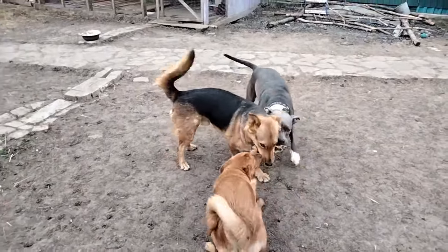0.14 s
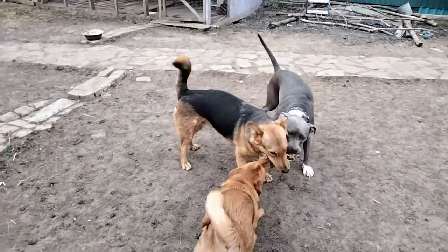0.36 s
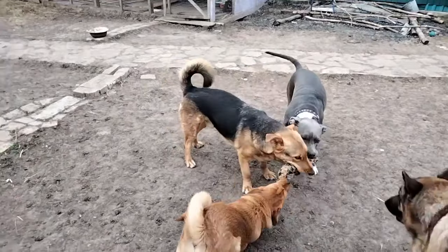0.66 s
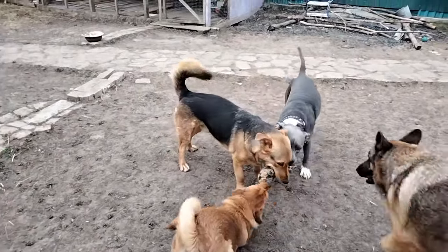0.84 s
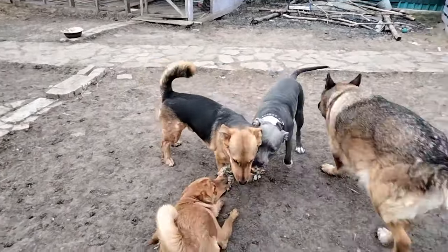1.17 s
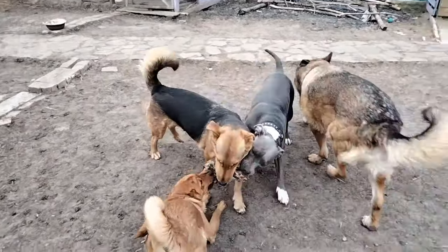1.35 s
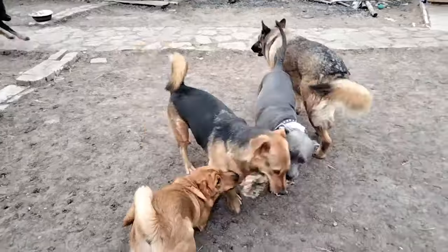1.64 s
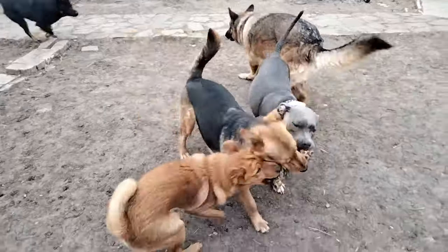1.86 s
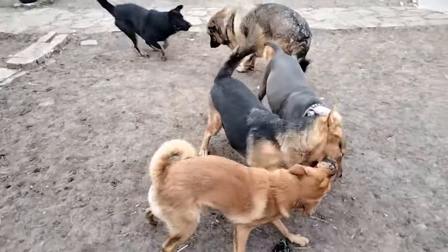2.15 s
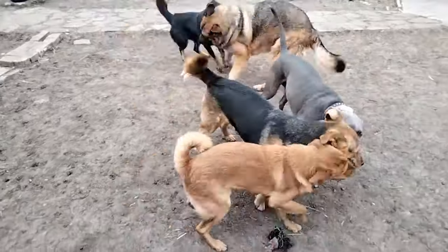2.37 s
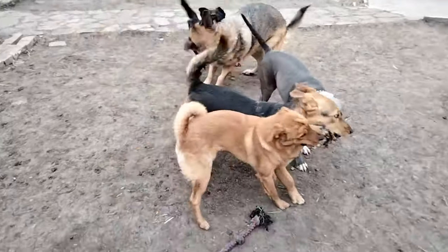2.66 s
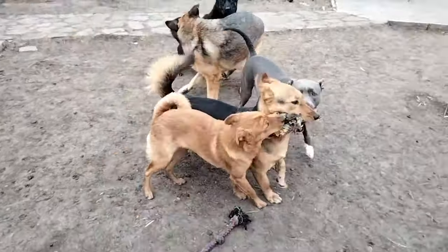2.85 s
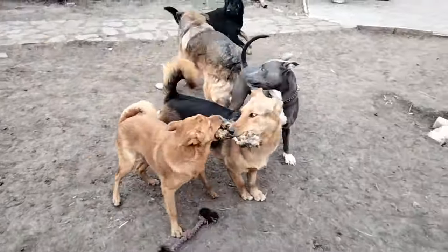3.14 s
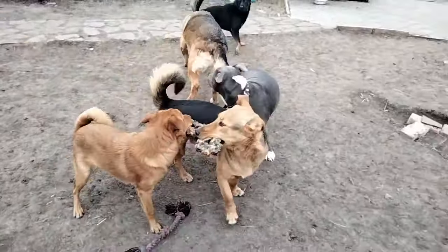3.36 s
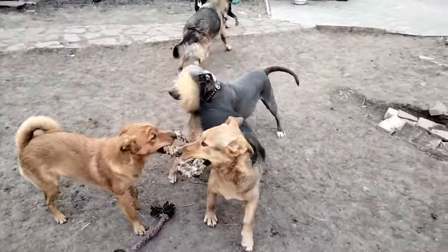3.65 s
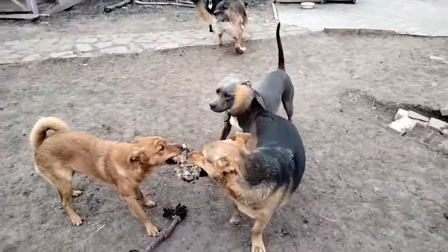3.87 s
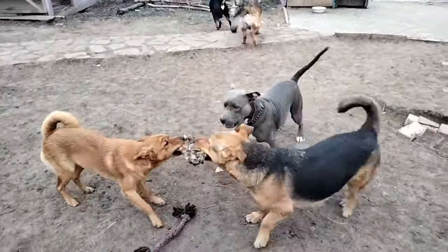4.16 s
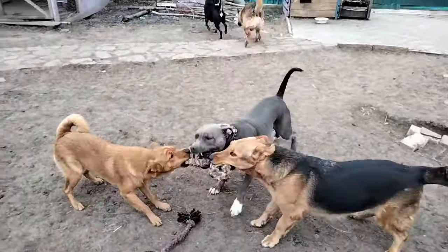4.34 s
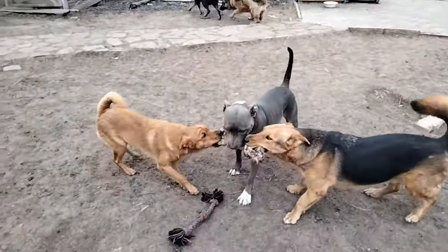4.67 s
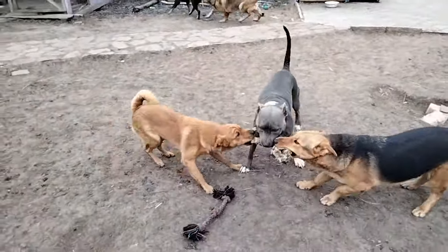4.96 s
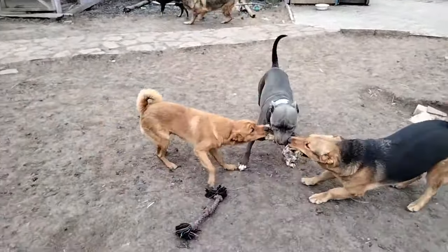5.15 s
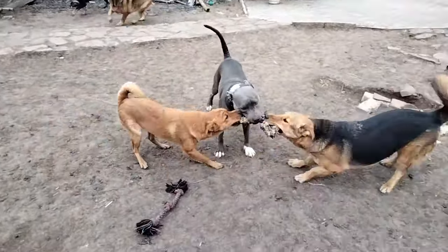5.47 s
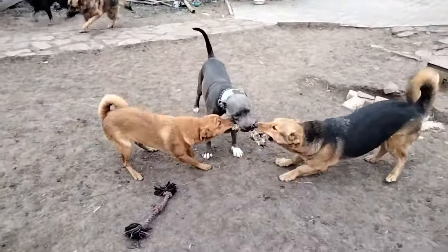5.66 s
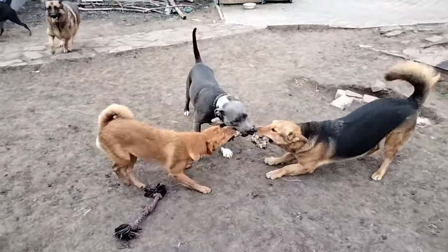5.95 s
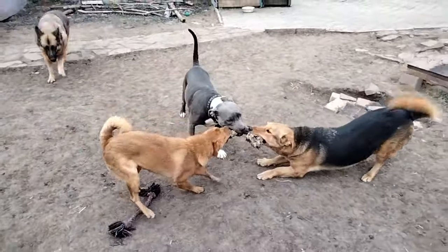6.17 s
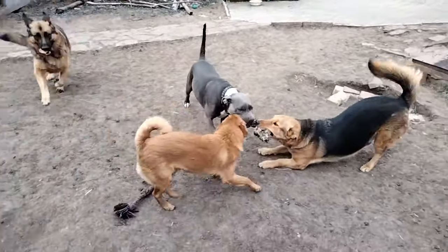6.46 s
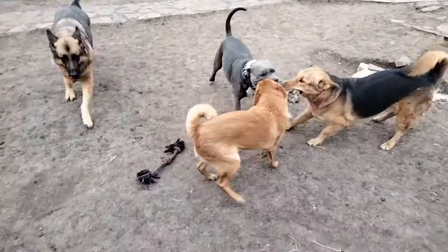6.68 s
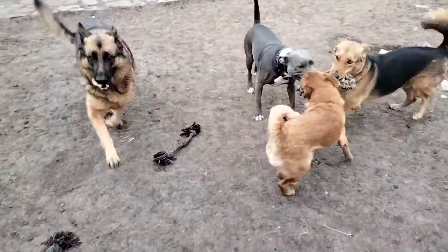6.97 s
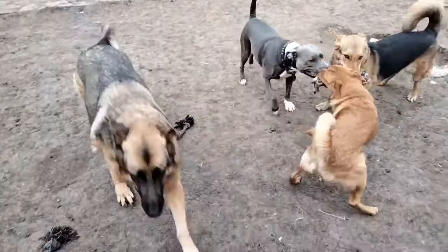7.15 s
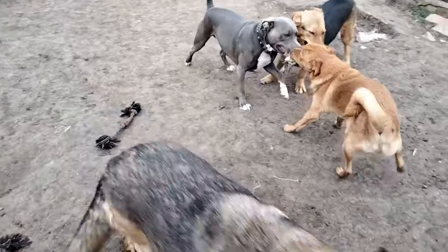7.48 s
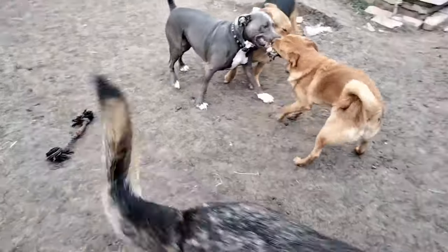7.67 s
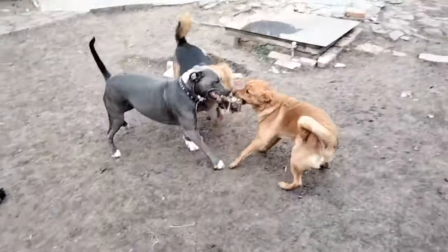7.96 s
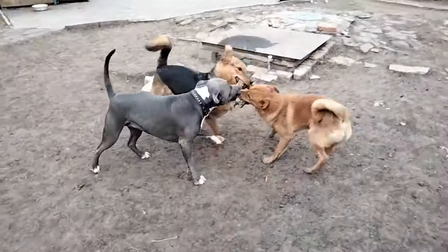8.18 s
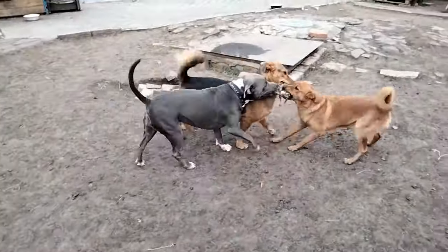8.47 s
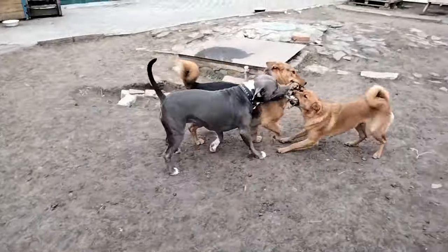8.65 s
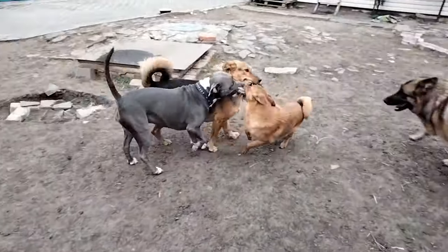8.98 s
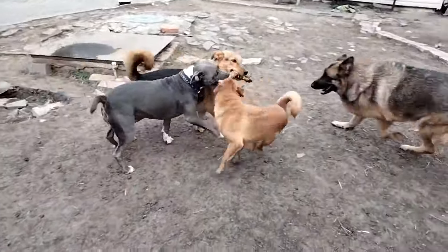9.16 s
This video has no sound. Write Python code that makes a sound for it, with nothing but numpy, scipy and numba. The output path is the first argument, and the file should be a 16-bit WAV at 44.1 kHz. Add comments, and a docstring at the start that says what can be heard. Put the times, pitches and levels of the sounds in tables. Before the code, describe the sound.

Outdoors in a dirt yard, several dogs tug at a toy, growling low and raspy through clenched teeth close to the microphone. Paws scuff and small clicks snap. Early on, a dog slightly further away gives a high yelp that breaks into a short moan, with a faint wall echo. Growls settle to grumbling with thin whines, then burst into a loud snarl and throbbing growls. Wind rumbles on the microphone.

```python
"""Dogs growl close by through clenched teeth, scuff the ground and click; one further off yelps, and a wall
throws the yelp back. Thin whines pass and wind rumbles on the microphone: they tug at a toy in a dirt yard.
Growls are uneven pulses and puffed air ringing in chest, mouth, throat and teeth. The yelp is a stack of
sines on one gliding pitch, the whines are single sines. Hiss, wind and thuds are shaped noise."""
import sys
import numpy as np
from scipy import signal
from scipy.fft import rfft, irfft, next_fast_len
from scipy.io import wavfile
from scipy.ndimage import uniform_filter1d
from numba import njit

SR = 44100
rng = np.random.default_rng(int(sys.argv[2]) if len(sys.argv) > 2 else 0)


def to_wav(sig):
    """Store sig (one row per channel, or 1-D mono) as 16-bit WAV at the path in sys.argv[1].

    Samples outside -1..1 are clipped; the rate is SR.
    """
    pcm = np.clip(np.atleast_2d(sig), -1, 1) * 32767
    pcm = np.round(pcm).astype(np.int16)
    wavfile.write(sys.argv[1], SR, pcm.T)  # frames by channels


N = 411012  # length in samples

CLEAR, HUSKY, GRUFF, TORN = .16, .3, .5, .85  # roughness of the vocal folds, 0-1
# Growls, which may overlap. Each row: start in seconds, length in seconds, mouth level in dB at the start,
# mouth level in dB at the end, chest level in dB, first mouth resonance in Hz, second mouth resonance in Hz,
# second resonance in dB relative to the first, then upper resonances, teeth and breath, each in dB relative
# to the mouth, fold pulses per second, roughness from 0 to 1.
GROWLS = [(0.0, 0.082, -72.5, -58, -54.5, 920, 1270, 4, -10, -22, -26, 110, TORN),
          (0.08, 0.42, -48, -49, -44, 826, 1190, 0.5, -8, -42, -17, 113.2, GRUFF),
          (0.43, 0.14, -49, -51, -49.5, 919.5, 1210, -12, -10, -40, -26.5, 120.2, GRUFF),
          (0.59, 0.47, -51, -54, -51.5, 946, 1240, -2.5, -7, -41, -30, 127.6, CLEAR),
          (1.04, 0.26, -63, -71, -74, 1015, 1211, -14, -13.5, -16, -10, 112.4, GRUFF),
          (1.411, 0.27, -52, -56.5, -49.5, 950, 1205, 11, 1.5, -17, -14, 125.9, CLEAR),
          (1.999, 0.29, -59.5, -61.5, -62, 672, 1235, 11, -8, -15, -13, 113.7, TORN),
          (2.30, 0.1, -51, -49.5, -42.5, 732, 1380, -4, -17, -16, -9.5, 109.6, TORN),
          (2.425, 0.068, -36, -36, -43.5, 850, 1390, -8, -12, -29, -25, 90, TORN),
          (2.5, 0.27, -37, -41, -47, 593, 1230, -9, -17, -43, -28, 100, TORN),
          (2.77, 0.2, -44, -46.5, -48, 581.7, 1339, -2.5, -9.5, -9.5, -10, 110.1, TORN),
          (3.03, 0.17, -49.5, -45.5, -46, 612, 1248, 7, 5.5, -18, -7, 110.9, TORN),
          (3.25, 0.16, -48.5, -48.5, -41.5, 697, 1484, -12, -8.5, -10, -8, 110.1, TORN),
          (3.389, 0.13, -41, -51, -49, 1062, 1590, 5, 1.5, -38, -25, 110.9, TORN),
          (3.51, 0.38, -57.5, -52.5, -51, 820, 1298, -5, -5.5, -18, -17, 107.5, TORN),
          (3.88, 0.13, -56.5, -57, -65, 668, 1344, -27, -32, -43, -21.5, 114, TORN),
          (4.078, 0.19, -51, -54, -61, 763, 1186, 11, 2, -11.5, -9, 125.8, GRUFF),
          (4.349, 0.079, -51, -56, -60, 938, 1350, 1, 2.5, -16, -1.5, 120.3, GRUFF),
          (4.46, 0.37, -64, -58, -60, 678, 1365, -28, 1.5, -10, -9, 117.7, CLEAR),
          (4.799, 0.19, -49.5, -52.5, -51, 680, 1380, 2, -5.5, -11, -17, 110.2, GRUFF),
          (5.0, 0.19, -51.5, -50, -47, 768.5, 1279, -3.5, -7.5, -21, -7.5, 111, GRUFF),
          (5.209, 0.4, -66.5, -55, -42.5, 717.5, 1190, 1, 1.5, -11, -14.5, 110.6, TORN),
          (5.549, 0.25, -50, -48, -47, 778, 1204, -1, -4.5, -17.5, -14, 119.1, GRUFF),
          (5.87, 0.23, -46, -53, -49, 835, 1232, 2, -7.5, -16.5, -11, 115.8, GRUFF),
          (6.1, 0.31, -65, -62, -83, 904, 1287, -1, 0, -12, -6, 99.6, GRUFF),
          (6.38, 0.4, -53, -41.5, -44, 852, 1245, 1.5, 1.5, -26, -12, 90.5, HUSKY),
          (6.7, 0.09, -41.5, -36, -47, 818.6, 1429, -3, -13, -16, -25, 100.1, GRUFF),
          (6.77, .07, -38, -20, -49, 881.7, 1672, -7, -15, -31, -26, 110, TORN),
          (6.845, .13, -19.5, -30, -41.5, 730, 1431, -3, -14.5, -42, -34, 109.6, TORN),
          (6.99, 0.39, -38, -42.5, -42.5, 804, 1430, -7, -8, -20.5, -21, 99.85, GRUFF),
          (7.38, 0.077, -48.5, -50, -52, 743, 1359, -2, 6, -15, -13, 85, GRUFF),
          (7.471, 0.37, -60, -61, -65, 730, 1363, -5, -0.5, -21, -27, 85, TORN),
          (7.72, 0.47, -43, -39, -44, 764.4, 1336, -21, -7.5, -15, -6.5, 96.6, HUSKY),
          (8.185, 0.06, -38.5, -32.5, -39.5, 734.4, 1461, -10, -18.5, -17, -19.5, 118.5, GRUFF),
          (8.26, 0.051, -33.5, -38, -37, 737.5, 1463, -9, -14.5, -13.5, -15.5, 115, GRUFF),
          (8.33, 0.16, -39, -41.5, -40, 761, 1373, -14, -14.5, -16.5, -13.5, 108, GRUFF),
          (8.489, 0.083, -36.5, -33, -39.5, 739.5, 1240, -43, -22, -50, -23.5, 101.8, GRUFF),
          (8.591, .13, -39, -46.5, -43, 748.6, 1263, -17, -6.5, -15, -10.5, 93.96, GRUFF),
          (8.74, 0.3, -51.5, -51.5, -56.5, 692.7, 1317, -7, -3, -14, -8.5, 94.8, GRUFF),
          (9.051, 0.084, -56, -50, -49, 766.6, 1460, 0, -8.5, -31, -4.5, 99.8, GRUFF),
          (9.14, 0.17, -37, -41.5, -38.5, 698.4, 1372, -13.5, -14.5, -16, -14, 105.3, TORN)]
# Resonances of the chest. Each row: centre in Hz, width in Hz, strength in dB.
CHEST = [(106, 67, 8.5), (208.2, 86, 7.5)]
# Resonances of the upper throat. Each row: centre in Hz, width in Hz, strength in dB.
UPPER = [(1680, 193, 25), (2128, 269, 26.5), (2920, 2700, 6)]
# Strongest tooth resonance as the lips move. Each row: time in seconds, centre in Hz.
LIPS = [(0, 4020), (3.2, 4020), (3.28, 3305), (3.45, 3354), (3.9, 4100), (6.5, 3705), (6.78, 3711),
        (6.82, 4148), (6.95, 3521), (7.4, 4008), (8.1, 4033), (8.2, 3825), (8.3, 3783), (8.36, 4163),
        (8.45, 4190), (8.55, 4505), (9.32, 4114)]
# Tooth resonances that slide together. Each row: ratio to the strongest one, strength in dB.
SNARL_COMB = [(0.872, 8.5), (1.002, 12), (1.188, 7), (1.38, -1.5)]
# Colour of hiss and clicks. Each row: frequency in Hz, relative density in dB per Hz.
RUSTLE = [(1470, -16.5), (2500, 2.5), (3160, -4.5), (3980, -35.5), (5190, -4), (6550, -5.5), (7830, 6.5),
          (9080, 6.5), (11100, -4), (15200, -12), (16000, -6.5)]
# Paws and fur scuffing the ground. Each row: start in seconds, length in seconds, level in dB.
SCUFFS = [(0.292, 0.092, -57), (0.59, 0.04, -64), (0.841, 0.095, -66), (1.068, .2, -68),
          (1.642, 0.064, -63.5), (2.15, 0.08, -50.5), (2.454, 0.038, -58), (2.706, 0.13, -50),
          (2.94, 0.1, -53.5), (4.814, 0.17, -58.5), (5.268, 0.052, -57), (6.928, 0.063, -55),
          (7.307, 0.03, -52.5), (7.388, 0.039, -52)]
# Colour of the wind. Each row: frequency in Hz, relative density in dB per Hz.
WIND = [(12, -27.5), (20, 6.5), (129, -4.5), (201, -56), (282, -13.5), (353, -80), (400, -54), (520, -66),
        (880, -120)]
# Strength of the wind. Each row: time in seconds, level in dB around which it wavers.
GUSTS = [(0.0, -46), (0.52, -48), (0.57, -51), (1.09, -51), (1.11, -44), (1.3, -53), (1.97, -43),
         (2.02, -51), (2.31, -40), (3.01, -55), (3.14, -50), (3.76, -52), (3.97, -42), (4.02, -50.5),
         (4.49, -53), (4.65, -36), (4.75, -43), (4.83, -36), (4.96, -42.5), (5.32, -36.5), (6.18, -47.5),
         (7.42, -49), (7.55, -61), (7.74, -45.5), (8.38, -66), (8.49, -40), (8.64, -50.5), (9.06, -37),
         (9.14, -53.5), (9.32, -51)]
# Colour of the steady background noise. Each row: frequency in Hz, relative density in dB per Hz.
FLOOR = [(59, -56), (100, -13.5), (160, -18.5), (461, -11.5), (818, -12.5), (3780, -26), (8460, -25.5),
         (16000, -42.5)]
# Claws, teeth and grit. Each row: time in seconds, strength in dB, duller part in dB relative to that.
CLICKS = [(0.0637, -43, -22), (0.1604, -45.5, -15), (0.2868, -42, -21), (0.3727, -39.5, -17),
          (0.603, -41, -31), (0.628, -36, -24), (0.896, -40, -32), (0.959, -41, -35), (1.0039, -37, -38.5),
          (1.0342, -31, -41), (1.664, -60, 1), (1.789, -70, 1), (1.808, -43, -26), (1.992, -44, -25.5),
          (2.024, -64, 5.5), (2.14, -39.5, -24), (2.189, -40, -16), (2.328, -40.5, -7), (2.341, -61, 10),
          (2.4453, -39.5, -20), (3.691, -45, -20), (3.827, -38.5, -13.5), (4.2427, -57, -18.5),
          (4.4771, -58, 3), (4.559, -45, -17), (5.1059, -62, 12.5), (5.9777, -41, -14), (6.16, -44, -15.5),
          (6.252, -39.5, -21), (6.6865, -56.5, 6.5), (6.816, -58.5, -1), (7.021, -49, 1), (7.183, -39, -3),
          (7.3168, -58, -19.5), (7.5086, -38, -15), (7.642, -35, -18), (8.5296, -54, -12),
          (8.88, -27.5, -45), (9.024, -53, -12)]
# Vocal folds slapping shut hard. Each row: time in seconds, strength in dB.
SLAPS = [(0.129, -39.5), (0.161, -44), (2.023, -49), (2.415, -32), (2.45, -26), (2.512, -28),
         (6.679, -26.5), (6.717, -28), (6.75, -22), (6.776, -23.5), (7.089, -31), (7.239, -30), (7.76, -36),
         (7.902, -29.5), (8.004, -28), (8.048, -29), (8.092, -28), (8.161, -35), (8.359, -31), (8.676, -36)]
# Thuds of paws and gusts. Each row: time in seconds, strength in dB, time to fall by 60 dB in seconds.
THUDS = [(0.467, -21.5, 0.07), (1.095, -48, 0.075), (1.868, -24, 0.11), (1.953, -42, 0.037),
         (2.282, -26, 0.05), (4.827, -40, 0.069), (5.331, -20.5, 0.12), (5.432, -38.5, 0.064),
         (6.064, -33, 0.061), (8.491, -38, 0.058)]
# Thin whines. Each row: start in seconds, length in seconds, pitch in Hz at start, at middle and at end,
# level in dB at start and at end.
WHINES = [(1.36, .105, 3100, 3200, 3380, -73, -66), (3.27, .15, 3350, 3250, 3150, -63, -62),
          (3.88, .09, 670, 670, 660, -54, -54), (3.98, .08, 4350, 4260, 4290, -64, -64),
          (4.01, .08, 730, 705, 705, -48, -51), (4.085, .13, 715, 770, 765, -49, -50),
          (4.11, .2, 3850, 3950, 3900, -61, -70), (4.618, .04, 3780, 3800, 3800, -52, -62),
          (4.648, .19, 3870, 3370, 3340, -49, -63), (4.82, .13, 6520, 7000, 7250, -65, -63),
          (4.875, .07, 3455, 3570, 3480, -64, -64), (8.43, .16, 3920, 3900, 3880, -64, -72)]
# The yelp and the moan after it. Each row: time in seconds, pitch in Hz, level in dB before the head
# colours it, overtones in dB relative to the head's colour.
YELP = [(2.66, 1337, -46, -12), (2.678, 1390, -17.5, -13), (2.705, 1368, -12.5, -13),
        (2.725, 1393, -15.5, -5.5), (2.75, 1416, -25.5, 4.5), (2.82, 1440, -28.5, 0.5),
        (2.88, 1412, -25.5, -2.5), (2.94, 1356, -20, -19), (2.97, 1324, -15, -11.5), (2.99, 1299, -26.5, 2),
        (3.0, 1240, -27, 6), (3.02, 1000, -35, 9), (3.045, 890, -39, 2), (3.075, 772, -33.5, -5.5),
        (3.11, 825, -23.5, -7.5), (3.135, 773.6, -22.5, 3.5), (3.155, 778, -20, -8), (3.183, 782, -25, -8),
        (3.2, 640, -36, 12), (3.218, 505, -52, 11), (3.25, 320, -60, -6), (3.39, 250, -60, -4),
        (3.415, 320, -52, 6), (3.435, 343, -43, -3), (3.51, 340, -46, -9), (3.56, 307, -50, -16.5),
        (3.7, 285, -53, -13), (3.85, 317.3, -54, -15), (4.0, 265, -52, -25), (4.1, 280, -64, 1)]
# Colour of the yelping head. Each row: frequency in Hz, strength in dB.
HEAD = [(250, 1.5), (540, 9.5), (690, -4), (765, -2), (1030, 4), (1400, 2.7), (1550, 5.5), (1680, 2),
        (1900, -2), (2300, -19.5), (2600, -15.5), (2900, -28), (3200, -31), (3950, -24), (5500, -30),
        (9000, -38)]
# High tones that linger on while the yelp breaks and falls below them. Each row: start in seconds, length in
# seconds, pitch in Hz at start, at middle and at end, level in dB at start and at end.
HELD = [(2.985, .085, 1320, 1300, 1300, -23, -30), (2.972, .075, 2670, 2630, 2380, -37, -33),
        (2.98, .065, 3990, 3900, 3620, -56, -53), (2.98, .06, 5330, 5240, 5050, -56, -55),
        (2.965, .075, 6750, 6560, 6300, -54, -47), (2.972, .068, 8100, 7870, 7500, -50, -52)]
# Wall echoes. Each row: delay in seconds, level in dB before the treble is dulled.
ECHOES = [(.047, -16)]
# The throat flaps and chops a growl into beats. Each row: first beat in seconds, length in seconds,
# beats per second, fade within a beat in dB.
THROBS = [(7.087, .2, 26, 5), (7.758, .44, 27.3, 4), (8.207, .13, 23, 4), (8.357, .15, 29, 3),
          (8.51, .2, 30, 4)]

ATTACK_S, RELEASE_S = .04, .1
CHEST_FOLLOWS = 0.17  # share of the mouth's swell that the chest takes
SLACK_PER_S, WEAK_BEAT_DB = 104, -3.5  # below this pulse rate, every other pulse grows weaker, at most this much
MOUTH_WIDTH_HZ, SECOND_WIDTH_HZ = 105, 105
JAW_SHAKE, JAW_DRIFT = .05, .015  # spread of quick shake (times roughness squared) and of slow wandering
LIPS_MOVE = .012  # spread of the slow wandering of the tooth resonances
SHUFFLE_DB = -66.5  # the steady shuffle under the scuffs
FLOOR_DB = -62.5
GLIDE_LOSS_DB = .8  # how strongly a fast glide dulls the yelp's overtones
YARD_T60_S, YARD_DB = .6, -16  # time for the tail to fall by 60 dB, tail level before the treble is dulled
CUTOFF_HZ = 15750


def from_db(db):
    """Decibels to gain."""
    return 10 ** (np.asarray(db) / 20)


def rms_one(x):
    """Scale a signal to unit rms (average power 1)."""
    return x / np.sqrt(np.mean(x ** 2) + 1e-20)


def in_time(rows):
    """Table columns as curves, one value a sample."""
    s, *columns = np.transpose(rows)
    return [np.interp(np.arange(N) / SR, s, column) for column in columns]


def each_sample(slow):
    """Millisecond values spread to one a sample."""
    return np.interp(np.arange(N) / SR * 1000, np.arange(len(slow)), slow)


def evened(x, span_s):
    """Divide out the slow level, averaged over span_s."""
    return x / np.sqrt(uniform_filter1d(x ** 2, int(span_s * SR)) + 1e-12)


def drift(rate):
    """Smooth random wandering of spread 1; a higher rate in Hz wanders faster."""
    r = np.exp(-2 * np.pi * rate / SR)
    noise = rng.standard_normal(N + SR)
    return rms_one(signal.lfilter([1], [1, -2 * r, r * r], noise)[SR:])


def coloured(spectrum):
    """Noise with the given spectrum, rms 1."""
    size = next_fast_len(N)
    hz = np.maximum(np.arange(size // 2 + 1) * SR / size, 1)
    points = np.array(spectrum)
    level_db = np.interp(np.log(hz), np.log(points[:, 0]), points[:, 1], left=-80)
    white = rfft(rng.standard_normal(size))
    return rms_one(irfft(white * from_db(level_db), size)[:N])


def band_passed(x, low_hz, high_hz):
    """Keep only the sound between two frequencies."""
    return signal.sosfilt(signal.butter(2, [low_hz, high_hz], "band", fs=SR, output="sos"), x)


@njit
def resonate(x, turn, r):
    """Two-pole resonance, gain 1 on top; turn is the centre in radians a sample and may move."""
    y = np.zeros(len(x))
    for i in range(2, len(x)):
        y[i] = (1 - r * r) / 2 * (x[i] - x[i - 2]) + 2 * r * np.cos(turn[i]) * y[i - 1] - r * r * y[i - 2]
    return y


def resonance(x, hz, width_hz):
    """A hollow that rings at hz, steady or moving."""
    return resonate(x, 2 * np.pi * hz / SR * np.ones(len(x)), np.exp(-np.pi * width_hz / SR))


def bank(x, modes):
    """Resonances side by side, with alternating sign."""
    return sum((-1) ** k * from_db(db) * resonance(x, hz, width) for k, (hz, width, db) in enumerate(modes))


def bursts(events, noise, rise_s=0):
    """Each event opens the noise within about rise_s and lets it die away."""
    gain = np.zeros(N)
    for s, db, t60 in events:
        at = int(s * SR)
        t = np.arange(min(SR // 4, N - at)) / SR
        gain[at:at + len(t)] += from_db(db - 60 * t / max(t60, .003))
    return uniform_filter1d(gain, 1 + int(rise_s * SR)) * noise


def swell(start, length, start_db, end_db):
    """Gain of one event, a value every millisecond: attack, a straight run in dB, release."""
    t = np.arange(0, N / SR, .001) - start
    attack = np.clip(t / ATTACK_S, 0, 1)
    release = np.clip(1 - (t - length) / RELEASE_S, 0, 1) ** 2
    return attack * release * from_db(np.interp(t, [0, length], [start_db, end_db]))


def throats():
    """Mouth and chest gains add up over the growls; all other settings are blends led by the louder dog."""
    mouth, chest = 1e-6, 0  # the tiny start keeps the division below safe in silence
    blend = 1e-6 * np.array(GROWLS[0][5:])[:, None]
    for start, length, start_db, end_db, chest_db, *settings in GROWLS:
        gain = swell(start, length, start_db, end_db)
        half_db = CHEST_FOLLOWS * (end_db - start_db) / 2
        mouth = mouth + gain
        blend = blend + gain * np.array(settings)[:, None]
        chest = chest + swell(start, length, chest_db - half_db, chest_db + half_db)
    return [each_sample(control) for control in (mouth, chest, *(blend / mouth))]


def folds(per_s, rough, jitter=.35, shimmer_db=3.3, breath=2.2, wander=.02):
    """Vocal folds: separate pulses, uneven in time and size; pulses plus puffed air; the puff shape."""
    uneven = jitter * rough ** 1.2 * drift(45) + wander * drift(3)
    cycles = np.cumsum(per_s * np.exp(uneven)) / SR
    at = np.flatnonzero(np.diff(np.floor(cycles)))
    every_other = np.arange(len(at)) % 2
    slack = np.clip((SLACK_PER_S - per_s[at]) / 8, 0, 1) * every_other
    pulses = np.zeros(N)
    pulses[at] = from_db(WEAK_BEAT_DB * slack + shimmer_db * rough[at] * rng.standard_normal(N)[at])
    puff = rms_one(signal.lfilter([1], [1, -np.exp(-1 / (.007 * SR))], pulses))  # dies over 7 ms
    pulses = rms_one(pulses)
    air = breath * (1.1 * rough + .17) * (puff + 1.2 * rough ** 2) * rng.standard_normal(N)
    return pulses, pulses + air, puff


def growl(pulses, breathy, level, chest_level, first_hz, second_hz, second_db, upper_db, rough):
    """The pulses ring in chest, mouth and upper throat; steep skirts keep the valleys dark."""
    def shaken(hz):
        return hz * np.exp(JAW_SHAKE * rough ** 2 * drift(20) + JAW_DRIFT * drift(3))

    first_hz, second_hz, stretch = shaken(first_hz), shaken(second_hz), shaken(1)
    # two resonances in a row make the steep skirts
    first = resonance(resonance(breathy, first_hz, MOUTH_WIDTH_HZ), first_hz, 430)
    second = resonance(resonance(breathy, second_hz, SECOND_WIDTH_HZ), second_hz, 1100)
    first = first + from_db(-3.5) * resonance(breathy, 0.852 * first_hz, 93)  # weaker throat resonance below
    mouth = evened(first - from_db(second_db) * second, 0.15)
    chest = evened(resonance(bank(pulses + 1.15 * breathy, CHEST), 120, 340), 0.084)
    # torn voices rattle in the windpipe, clear voices hum through the nose
    windpipe = evened(resonance(resonance(breathy, 414, 160), 457, 450), 0.07)
    mouth = mouth + rough ** 3 * from_db(-10.5) * windpipe
    nose = evened(resonance(resonance(pulses, 610, 220), 610, 400), 0.12)
    nose = (1 - rough) ** 6 * from_db(-4) * nose
    upper = bank(breathy, [(hz * stretch, width, db) for hz, width, db in UPPER])
    upper = evened(signal.sosfilt(signal.butter(2, 1500, "high", fs=SR, output="sos"), upper), 1.0)
    return level * (mouth + nose + from_db(upper_db) * upper) + chest_level * chest


def snarl(breathy, level, width_hz=300, flicker_db=3):
    """The tooth resonances slide together as the lips move; each swells and fades on its own."""
    hz = in_time(LIPS)[0] * (1 + LIPS_MOVE * drift(0.77))
    comb = np.zeros(N)
    for ratio, db in SNARL_COMB:
        tooth = resonance(resonance(breathy, ratio * hz, width_hz), ratio * hz, 470)
        comb += from_db(db + flicker_db * drift(6.0)) * tooth
    return level * evened(comb, 0.16)


def shuffling():
    """Level of the ground noise: a wavering steady shuffle plus the separate scuffs."""
    scuffs = sum(swell(s, length, db, db) for s, length, db in SCUFFS)
    return from_db(SHUFFLE_DB + 1.5 * drift(4.1)) + each_sample(scuffs)


def rustle(shuffle, breath_level, mouth, puff, grit_db=2.5, quiet_db=-52, loud_db=-40, tube_hz=760, echo=0.53):
    """Gritty hiss; in harder growls more of it is breath that throbs with the folds and rings in a tube."""
    share = np.clip((20 * np.log10(mouth) - quiet_db) / (loud_db - quiet_db), 0, .8)
    # the throat tube sends the sound back and forth
    round_trip = np.r_[1, np.zeros(int(SR / tube_hz) - 1), -echo]
    breath = rms_one(signal.lfilter([1], round_trip, coloured(RUSTLE) * puff ** 2))
    grit = coloured(RUSTLE) * from_db(grit_db * drift(60))
    return np.hypot(shuffle, breath_level) * evened((1 - share) * grit + share * breath, 0.17)


def wind_rumble():
    """Low noise that rises and falls with the gusts."""
    return from_db(in_time(GUSTS)[0] + 1.4 * drift(3.1)) * evened(coloured(WIND), 0.41)


def background():
    """Steady noise whose level wanders a little."""
    return from_db(FLOOR_DB + 3.6 * drift(3.2)) * coloured(FLOOR)


def clicks(crack_s=0.0077, tail_s=0.057, tail_db=-14):
    """A bright noise crack with a short tail, and a duller part of its own strength."""
    dull = rms_one(band_passed(rng.standard_normal(N), 1800, 5000))
    cracks = bursts([(s, db, crack_s) for s, db, dull_db in CLICKS], 0.76, rise_s=0.00045)
    tails = bursts([(s, db + tail_db, tail_s) for s, db, dull_db in CLICKS], 0.96, rise_s=0.0052)
    knocks = bursts([(s, db + dull_db, tail_s) for s, db, dull_db in CLICKS], dull, rise_s=0.0022)
    return (cracks + tails) * coloured(RUSTLE) + knocks


def slaps(first_hz, second_hz, width_hz=130, second_db=-13, duck_db=-3, duck_s=.01):
    """Single hard pulses ring in the mouth; also the growl's gain, which dips briefly just before each."""
    s, db = np.transpose(SLAPS)
    hits, caught = np.zeros(N), np.zeros(N)
    hits[(s * SR).astype(int)] = from_db(db) * SR / (np.pi * width_hz)
    caught[((s - duck_s / 2) * SR).astype(int)] = duck_s * SR
    first, second = [resonance(resonance(hits, hz, width_hz), hz, 240) for hz in (first_hz, second_hz)]
    dip = from_db(duck_db * uniform_filter1d(caught, int(duck_s * SR)))
    return first - from_db(second_db) * second, dip


def thuds():
    """Single low pushes that die away, filtered to the bass."""
    return band_passed(bursts(THUDS, 1.13, rise_s=0.00277), 35, 300)


def whines(rows, waver_hz=25, break_db=4.5, edge_s=.012):
    """Single sines that waver in pitch and break in level."""
    out = np.zeros(N)
    wobble, breaks_db = waver_hz * drift(60), break_db * drift(50)
    for s, length, start_hz, middle_hz, end_hz, start_db, end_db in rows:
        span = slice(int(s * SR), int((s + length) * SR))
        share = np.linspace(0, 1, span.stop - span.start)
        curve = np.polyfit([0, .5, 1], [start_hz, middle_hz, end_hz], 2)
        hz = np.polyval(curve, share) + wobble[span]
        edges = np.clip(np.minimum(share, 1 - share) * length / edge_s, 0, 1)
        level = edges * from_db(start_db + (end_db - start_db) * share + breaks_db[span])
        out[span] += np.sqrt(2) * level * np.sin(2 * np.pi * np.cumsum(hz) / SR)
    return out


def sounding(rows, edge_s=0.0022):
    """1 inside the table's time span, with soft edges."""
    start, end = rows[0][0], rows[-1][0]
    return np.interp(np.arange(N) / SR, [start - edge_s, start, end, end + edge_s], [0, 1, 1, 0])


def yelp(waver=.004, flutter_db=.7, break_db=5):
    """Seven partials on one gliding pitch; the first is cleanest, high ones break up; the head colours all."""
    hz, level_db, overtones_db = in_time(YELP)
    # glide speed in octaves a second
    glide = np.abs(uniform_filter1d(np.gradient(np.log2(hz)) * SR, int(.01 * SR)))
    # the faster the glide and the lower the moan, the less steady the pitch
    hoarse = 1 + .3 * glide + 7 * (hz < 400) + 25 * (hz < 325)
    phase = 2 * np.pi * np.cumsum(hz * (1 + hoarse * waver * drift(37.2))) / SR
    head_hz, head_db = np.transpose(HEAD)
    spread_db = [flutter_db, 2 * flutter_db] + [break_db] * 5
    tone = np.zeros(N)
    for k in range(1, 8):
        colour_db = np.interp(np.log(k * hz), np.log(head_hz), head_db)
        loss_db = GLIDE_LOSS_DB * min(k - 1, 3) ** 2 / 3 * glide
        partial_db = level_db + (k > 1) * overtones_db - loss_db + colour_db
        unsteady_db = np.maximum(spread_db[k - 1] + .15 * glide, 4.5 * (hz < 400))
        tone += from_db(partial_db + unsteady_db * drift(52)) * np.sin(k * phase)
    return np.sqrt(2) * sounding(YELP) * tone


def yard(x):
    """The direct sound, the wall's echo and a short diffuse tail."""
    t = np.arange(int(.6 * SR)) / SR
    tail = rng.standard_normal(len(t)) * from_db(-60 * t / YARD_T60_S) * (t > .02)
    reply = from_db(YARD_DB) * tail / np.sqrt(np.sum(tail ** 2))
    reply[0] = 1  # the direct sound
    for s, db in ECHOES:
        reply[int(s * SR)] += from_db(db)
    reply[1:] = signal.lfilter([.3], [1, -.7], reply[1:])  # walls return the treble weaker
    return signal.fftconvolve(x, reply)[:N]


def throb(rise=.25, uneven_db=1.5):
    """Gain of the throat's flapping beats: each opens fast and fades until the next."""
    t = np.arange(0, N / SR, .001)
    db = np.zeros(len(t))
    for start, length, per_s, fade_db in THROBS:
        beats = (t - start) * per_s + rise
        shape = np.interp(beats % 1, [0, rise, 1], [-.6, .4, -.6])
        size_db = uneven_db * rng.standard_normal(40)[np.clip(beats.astype(int), 0, 39)]
        db = db + (fade_db * shape + size_db) * ((beats > 0) & (t < start + length))
    return each_sample(uniform_filter1d(from_db(db), 3))


def scene():
    """All sources added up at one microphone."""
    mouth, chest, first_hz, second_hz, second_db, upper_db, teeth_db, breath_db, per_s, rough = throats()
    pulses, breathy, puff = folds(per_s, rough)
    beats = throb()
    slapped, caught = slaps(first_hz, second_hz)
    growls = growl(pulses, breathy, mouth * beats * caught, chest,
                   first_hz, second_hz, second_db, upper_db, rough)
    snarls = snarl(breathy, mouth * np.sqrt(beats) * from_db(teeth_db))
    hiss = rustle(shuffling(), mouth * from_db(breath_db), mouth, puff)
    distant = yard(yelp() + whines(HELD))
    voices = growls + snarls + slapped + whines(WHINES) + distant
    return (voices + hiss + wind_rumble() + background() + clicks() + thuds())[None]


def record(dry):
    """A steep low-pass filter cuts off the top of the treble."""
    return signal.sosfilt(signal.ellip(10, .5, 75, CUTOFF_HZ, fs=SR, output="sos"), dry)


dry = scene()
out = record(dry)
to_wav(out)
```